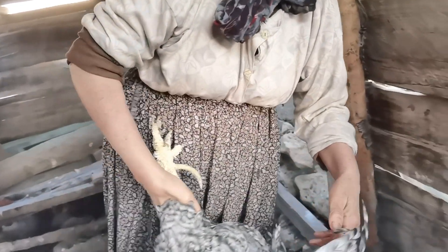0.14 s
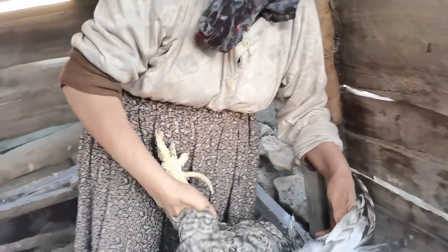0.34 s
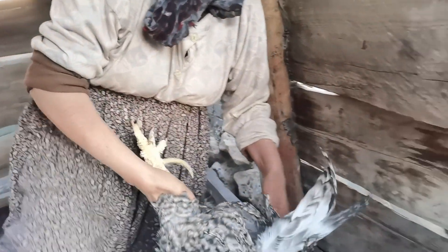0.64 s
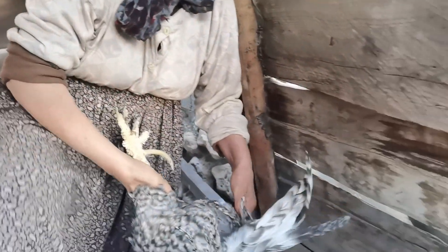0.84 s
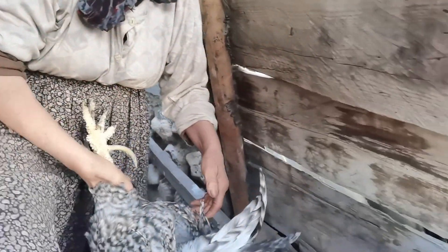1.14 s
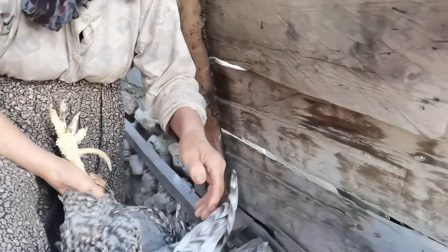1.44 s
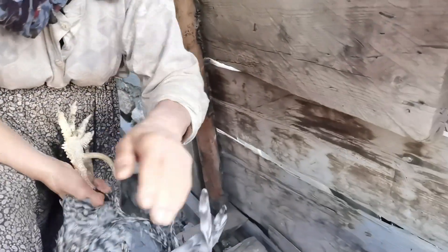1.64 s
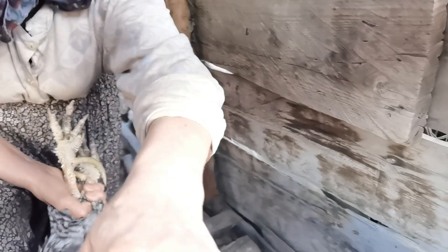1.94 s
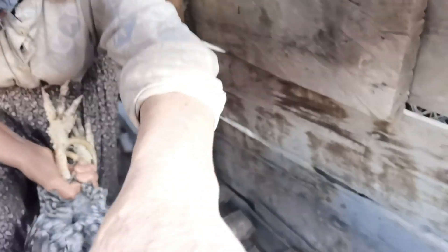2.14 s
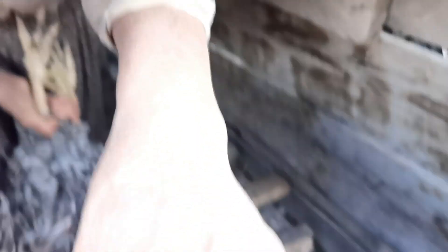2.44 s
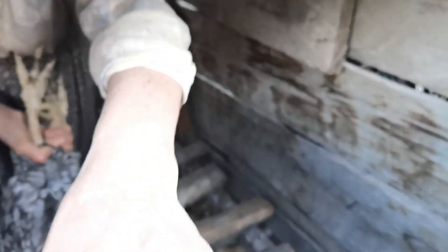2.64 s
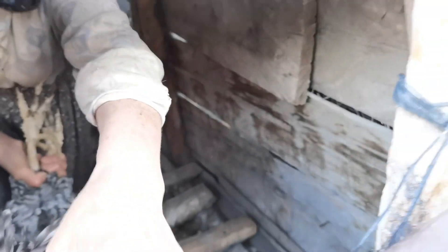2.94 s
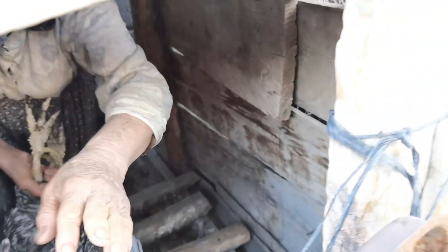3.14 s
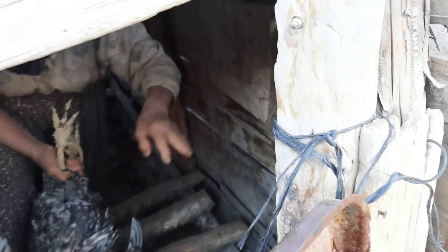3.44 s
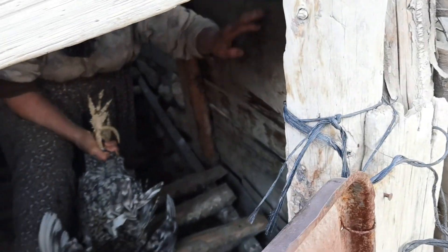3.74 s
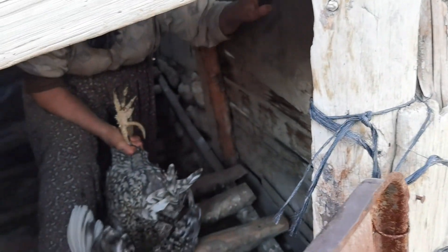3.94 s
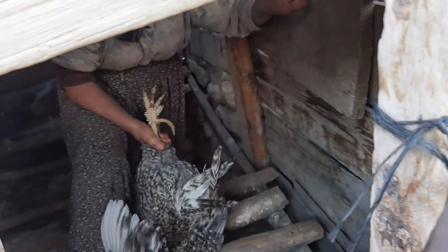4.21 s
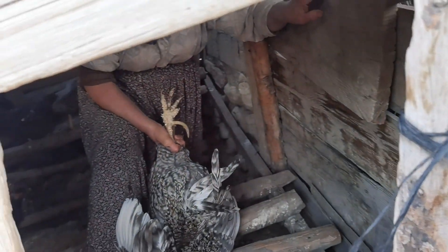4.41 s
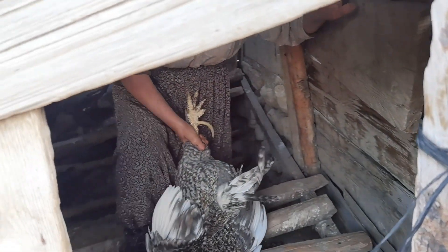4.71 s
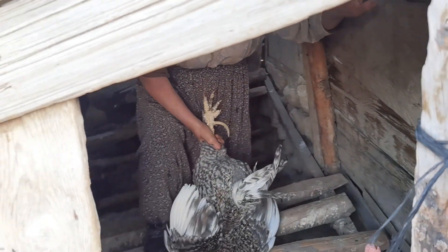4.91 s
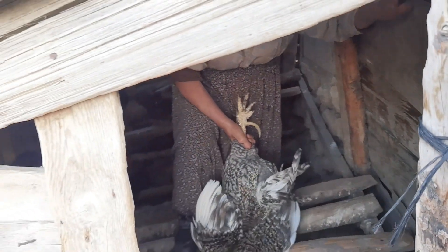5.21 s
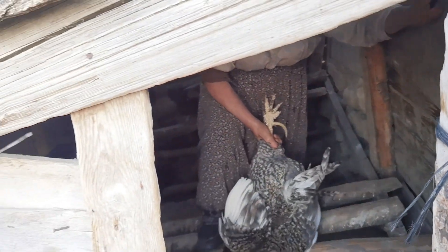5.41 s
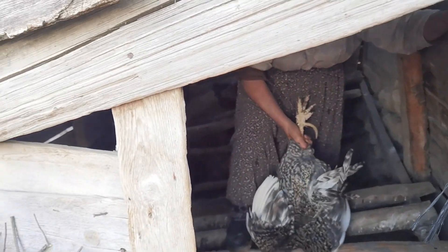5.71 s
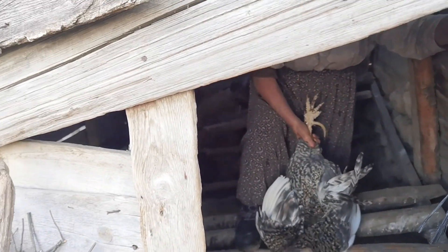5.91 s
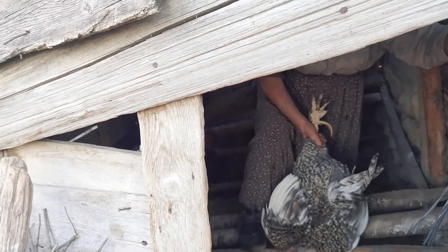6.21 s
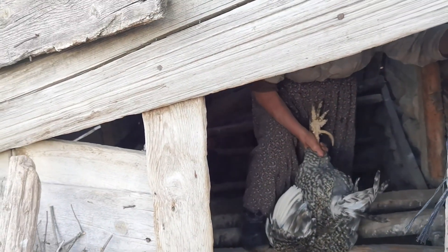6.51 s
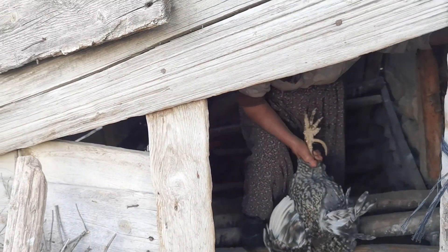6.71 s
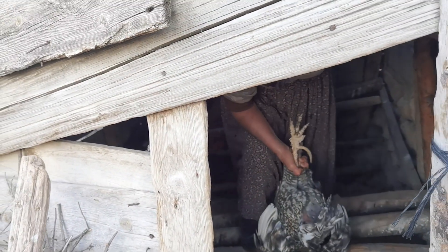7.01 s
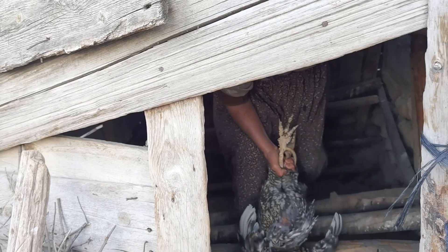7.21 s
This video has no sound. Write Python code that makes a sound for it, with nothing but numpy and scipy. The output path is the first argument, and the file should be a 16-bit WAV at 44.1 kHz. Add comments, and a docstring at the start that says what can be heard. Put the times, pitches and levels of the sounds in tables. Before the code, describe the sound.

A rooster held by its legs cries out in a wooden coop, close to a handheld stereo microphone. The first squawk, 0-0.8 s, rises from a muffled moan to a loud, hoarse rasp, then steadies into a buzzy tone and falls. Faint knocks and gulps follow, and a second strong rasping call runs from 1.3 to 2.1 s. At about 2.4-2.7 s come sharp cracks, a rustle and a low hollow ring. A somewhat weaker third squawk spans 2.5-3.3 s. Soft thuds and gulps lead to the fourth, 3.8-4.6 s, and the fifth, 5.1-5.9 s, which ends clearer. Light knocks and a dry hinge creak occupy 5.9-6.6 s, with quick gulps. The last call, 6.6-7.3 s, is higher and cleaner, dropping abruptly. Low handling rumble, quiet yard murmur and dry rustle continue throughout, with short plank reflections.

```python
"""A rooster's syrinx drives six squawks with two oscillators: a rising whistle and a lower flap.
Unlocked oscillators mix into a rasp; locked ones give a clear stack of harmonics, shaped by throat and gape.
Gulps precede calls as damped tones and noise puffs; the planks of the coop answer with decaying noise.
Short knocks are noise bursts, a hinge creaks by stick-slip, and a hollow thing rings in two modes.
Shaped noise gives hand rumble, yard murmur and a swelling dry rustle at two hand-held microphone ports."""
import sys
import numpy as np
from scipy import signal
from scipy.fft import rfft, irfft, next_fast_len
from scipy.io import wavfile
from scipy.ndimage import uniform_filter1d, map_coordinates

SR = 44100
rng = np.random.default_rng(int(sys.argv[2]) if len(sys.argv) > 2 else 0)


def pcm_store(signal):
    """Save signal as 16-bit PCM."""
    levels = np.round(np.clip(np.atleast_2d(signal), -1, 1) * 32767)
    wavfile.write(sys.argv[1], SR, levels.astype(np.int16).T)


N = 324443

# Course of the voice: (time [s], whistle pitch [Hz], whistle level [dB], throat effort [dB])
VOICE = [(0, 929, -63, -39), (.04, 945.9, -43, -67), (.214, 1016, -36.5, -60.5), (.224, 1075, -30.5, -32),
         (.28, 1151, -23, -18.5), (.4, 1218, -16.5, -17), (.46, 1196, -25.5, -16.5),
         (.55, 1211, -23.5, -14), (.62, 1180, -24.5, -17), (.68, 1147, -17, -15.5), (.72, 1010, -19.5, -21),
         (.75, 932.7, -34, -41.5), (.775, 899.5, -72, -54.5), (1.27, 889.8, -72.5, -61),
         (1.35, 945.1, -45, -71), (1.47, 1031, -32.5, -60), (1.53, 1058, -29, -28.5),
         (1.6, 1130, -31, -22.5), (1.63, 1153, -52.5, -20.5), (1.65, 1179, -17.5, -19.5),
         (1.9, 1198, -17, -15), (1.97, 1180, -16.5, -18), (2.03, 1116, -19.5, -20.5),
         (2.065, 997.6, -34.5, -32), (2.11, 940.1, -75, -56.5), (2.54, 951.2, -71, -51),
         (2.62, 944, -41, -72), (2.75, 974.2, -47, -53), (2.82, 1122, -33.5, -35.5), (2.9, 1169, -34, -29),
         (3.07, 1161, -32.5, -25), (3.13, 1145, -21, -27.5), (3.2, 1059, -34, -25.5),
         (3.24, 1049, -37.5, -43.5), (3.28, 1023, -60, -71.5), (3.83, 967.8, -59, -73),
         (3.97, 965.2, -49, -69.5), (4.04, 1042, -33, -36), (4.09, 1082, -40, -29),
         (4.18, 1114, -23.5, -23), (4.25, 1124, -29, -19), (4.45, 1198, -24.5, -18),
         (4.49, 1082, -37, -15.5), (4.555, 1062, -29.5, -17), (4.59, 1017, -45, -40.5),
         (4.63, 994.2, -68, -71.5), (5.13, 846, -63.5, -51), (5.22, 893.4, -45, -78),
         (5.3, 919.2, -44, -54.5), (5.36, 1075, -28.5, -35), (5.41, 1171, -34, -23),
         (5.5, 1263, -33.5, -18), (5.735, 1269, -36, -20.5), (5.765, 1058, -32.5, -20.5),
         (5.805, 1043, -27, -22.5), (5.835, 918, -32, -36.5), (5.89, 850, -76, -83),
         (6.57, 968.5, -58, -61), (6.65, 998.4, -48, -52.5), (6.73, 1013, -65, -45),
         (6.79, 1171, -37, -29.5), (6.83, 1284, -31, -25.5), (6.985, 1356, -24.5, -20.5),
         (7.02, 1385, -26, -19.5), (7.165, 1367, -30, -20), (7.195, 1096, -41, -19),
         (7.232, 1043, -39, -27.5), (7.262, 922, -33.5, -45.5), (7.3, 855, -88, -48.5)]
# Steadier stretches of the syrinx:
# (start [s], end [s], roughness [0-1], half-pitch lines [0-1], quarter-pitch lines [0-1])
LOCKED = [(.215, .27, .3, 0, 0), (.5, .57, .6, .85, 0), (.57, .67, .4, .8, .6), (.67, .74, .25, 1, .2),
          (1.915, 2.0, .28, .8, .6), (2.0, 2.06, .22, 1, .3), (3.065, 3.15, .45, .85, .5),
          (3.15, 3.215, .2, .7, .1), (4.0, 4.07, .3, 0, 0), (4.16, 4.2, .45, 0, 0),
          (4.485, 4.57, .12, 1, 0), (5.34, 5.4, .15, 0, 0), (5.755, 5.84, .14, 1, 0),
          (6.79, 6.83, .2, .2, 0), (6.83, 6.852, .6, .2, 0), (6.852, 6.995, .15, .35, 0),
          (7.185, 7.255, .27, 1, 0)]
# A moan through the shut beak, a rasp as it opens, locking, then spent breath:
# (start [s], flap leap [s], beak opening [s], locking [s], end [s])
PHASES = [(0, .2, .22, .55, .79), (1.27, 1.415, 1.5, 1.915, 2.12), (2.54, 2.8, 2.8, 3.07, 3.28),
          (3.83, 4.1, 4.03, 4.485, 4.63), (5.13, 5.36, 5.33, 5.755, 5.89), (6.57, 6.75, 6.75, 7.185, 7.3)]
# Differences between squawks: (flap pitch in the moan [Hz], after its leap [Hz], at the lock [Hz],
# gape resonance on opening [Hz], midway [Hz], at the lock [Hz], chest level in the moan [dB],
# chest level in the rasp before it follows effort [dB], treble level before clarity dulls it [dB],
# left over right [dB], upper beak band [relative], hoarse shaking of the flap [relative],
# gain of the air above the beak band [dB], gain of the palate band [dB])
SQUAWKS = [(485.7, 535, 610, 2300, 2310, 2400, -37.5, -31, -11.5, -2.5, 3.7, 2.3, -1, 0),
           (368.9, 500, 540, 2800, 2550, 2300, -31, -31.5, -11.5, 1.5, 2.2, 0.9, 2, 2),
           (504.5, 565, 545, 2460, 2440, 2700, -34.5, -45.5, -10.5, 5.5, 11, 1.4, 2, 2),
           (494.7, 545, 570, 2100, 2280, 2240, -41, -35, -13.5, 3.5, 14, 1.1, 4.5, -3.5),
           (411.4, 535, 560, 2800, 2350, 2150, -44, -37, -19.5, 2, 5, 1.4, -4.5, -0.5),
           (526.7, 555, 565, 2350, 2500, 2150, -42, -37, -15, 0.5, 2.1, 0.8, -0.5, 0)]
# Throat response: (frequency [Hz], relative gain [dB])
THROAT = [(900, -47), (1400, -13), (1650, -12.5), (1950, -11.5), (2300, -8.5), (2650, -10), (3050, -14),
          (3350, -14), (3950, -21.5), (4550, -16.5), (5700, -18.5), (7600, -31.5), (9300, -20),
          (10400, -29), (15500, -38.5)]
# Chest response: (frequency [Hz], relative gain [dB])
CHEST = [(250, -33.5), (400, -14), (520, -5), (800, 1), (1000, 2.5), (1350, -4), (1700, -49.5)]
# Gulps before a call: (time [s], level before fixed gains [dB], bright part above it [dB])
GULPS = [(1.227, -45.5, 12), (1.251, -38.5, 5.5), (1.266, -42.5, -19), (2.533, -41, 12.5), (3.746, -59, 0),
         (3.779, -48.5, -10), (3.794, -45, 9), (3.815, -48, 10), (3.856, -53, 18.5), (5.051, -59, 16.5),
         (5.08, -48.5, 17), (5.095, -45.5, 20), (5.112, -45.5, 19.5), (6.438, -52, 14), (6.471, -54, 21),
         (6.48, -52, 24), (6.497, -44, 23), (6.517, -47.5, 22), (6.528, -41, 22.5)]
# Phase lead of the left port over the right: (frequency [Hz], phase [rad])
PORT_LEAD = [(300, 0), (1000, 0.69), (2700, 1.66), (5000, 1), (12000, -4.5)]
# Turning of the microphones: (time [s], advance of the left port over the right [ms])
TURN = [(.5, -0.0039), (1.8, 0.068), (3, 0.18), (4.3, -0.003), (5.6, -0.061), (7, -.1)]
# Decay of the plank answer: (frequency [Hz], 60 dB decay time [s])
PLANKS = [(300, 0.12), (10000, 0.025)]
# Modes of the hollow thing: (frequency [Hz], level [dB], 60 dB decay time [s])
HOLLOW_MODES = [(325, -2, 2.2), (150, -7, 1.2)]
# Bumps that ring it: (time [s], level before the mode levels [dB])
HOLLOW_HITS = [(2.43, -57), (2.483, -49.5)]
# Short noisy knocks, the first probably a gulp:
# (time [s], level before fixed gains [dB], thud relative to it [dB], 60 dB decay time of the noise tail [s])
KNOCKS = [(0.0044, -37.5, -8, 0.046), (0.8719, -43, -27, 0.087), (1.0161, -42, -25, 0.25),
          (1.1946, -41.5, -11, 0.46), (2.4285, -21, -37.5, 0.46), (2.4839, -23, -19.5, 0.17),
          (2.7158, -19.5, -20.5, 0.33), (3.4635, -42, 5.5, 0.15), (3.6282, -59.5, 10, 0.089),
          (4.688, -36, -2, 0.19), (5.909, -38.5, -33, 0.05), (5.931, -44, -2, 0.11),
          (5.95, -42, -13, 0.048), (6.232, -41, -6, 0.1)]
# Colour of the crack: (frequency [Hz], relative gain [dB])
KNOCK_COLOUR = [(530, -44), (900, -26), (1340, -1.5), (1770, -10), (2140, -4.5), (4570, -11.5),
                (7400, -21.5), (8980, -20), (16000, -28)]
# A door hinge slips: (time [s], mean slip rate [1/s], level before fixed gain [dB])
CREAK = [(5.95, 72, -65), (6.05, 200, -67), (6.3, 290, -74.5), (6.38, 370, -57), (6.45, 120, -57),
         (6.55, 60, -46), (6.64, 22, -66), (6.68, 21, -113)]
# Handling rumble: (time [s], level before bumps [dB])
HANDS = [(0, -63.5), (1, -69), (1.9, -49.5), (2.3, -60.5), (2.6, -54.5), (3.7, -61.5), (5.6, -55),
         (6.6, -58.5), (7.36, -55.5)]
# The grip jolts: (time [s], rise of the rumble [dB])
BUMPS = [(1.13, 8.5), (2.088, 10.5), (6.03, 4), (6.236, 2.5)]
# The background noise swells: (start [s], end [s], murmur level [dB], rustle level [dB])
SWELLS = [(0, 0.179, -65.5, -63), (1.11, 1.496, -71.5, -67.5), (2.148, 2.437, -75.5, -64),
          (2.401, 2.552, -49.5, -49.5), (4.638, 4.809, -53.5, -56), (5.877, 6.622, -64.5, -67.5),
          (7.258, 7.397, -50.5, -65.5)]
# Constant floor under the swells: (murmur level [dB], rustle level [dB])
FLOOR_DB = (-64, -71.5)
# Thin wavering tones: (start [s], end [s], frequency [Hz], mean level [dB])
THIN_TONES = [(0.753, 1.158, 1148, -69.5), (3.45, 3.884, 224, -62.5)]
# Noise spectra of rumble, yard murmur and dry rustle: (frequency [Hz], relative gain [dB])
RUMBLE = [(20, -20.5), (64, 0), (211, -7), (300, -12.5), (390, -42), (660, -89.5)]
YARD = [(150, -34), (250, -0.5), (600, -2.5), (1200, -8.5), (2500, -16.5), (5000, -32.5)]
RUSTLE = [(1500, -13.5), (3000, -6.5), (5500, -11.5), (7500, -28.5), (9400, -1.5), (11500, -14.5),
          (16000, -15.5)]

FLAP_CLIMB, FLAP_SAG = 1.06, .75  # pitch ratios: climb through the moan, fall as the breath ends
LEAP_S, GASP_S = .03, .06  # duration of the flap leap; the moan level holds until this long before the end
FREE_ROUGH = .8  # roughness of the unlocked oscillators, 0-1
CLEAR_DB = 0.03  # scale of the overtone loss per quarter-pitch step in a clear voice
CHEST_HZ, SHUT_HZ = 790, 2158  # chest resonance; gape resonance as the beak closes, before clarity tunes it
LOCKED_THIRD_DB = -6.5  # third harmonic of a fully locked, clear flap relative to effort
MOAN_SWELL_DB, SPENT_DB = 8.5, -71  # rise through the moan; moan level at the end
CHEST_FOLLOWS, FULL_DB, LOCK_DB = 0.47, -18, 5  # chest dB per dB of effort, full effort, gain at full lock
BUMP_S, SWELL_EDGE_S = 0.074, 0.26  # 1/e half-width of a jolt; ramp of a noise swell before squaring
TOP_HZ = 15950  # upper band limit


def rooster():
    """Two coupled oscillators: flap-shaken whistle pulses excite the throat and their mixing fills the chest."""
    hz, whistle_db, effort_db = curves(VOICE)
    free_hz, gape_hz, moan_db, rasp_db = gestures()
    t = np.arange(N) / SR
    call = np.array([(t >= a) & (t < b) for a, *_, b in PHASES])
    on = uniform_filter1d(call.sum(axis=0) * 1., size=601)
    traits = uniform_filter1d(np.transpose(SQUAWKS)[-6:] @ call, size=601)
    tilt_db, pan_db, upper, hoarse, air_db, palate_db = traits
    rough, half, quarter = locking(t)
    clear = 1 - rough / FREE_ROUGH
    gape_hz = gape_hz + clear * (2 * hz - gape_hz)  # a clear voice tunes the gape to its second harmonic

    phase = 2 * np.pi * np.cumsum(hz) / SR
    flap_hz = np.where(half > .1, hz / 2, free_hz)
    flap = 2 * np.pi * np.cumsum(flap_hz) / SR + .6 * hoarse * rough * (1 - half) * wobble(60)
    jitter = rough ** 2 * amp(2.5 * wobble(11)) * (1.3 * wobble(90) + 0.9 * wobble(500))
    shaken = phase + jitter + rough ** 3 * np.sin(flap) + 0.13 * wobble(300)
    pulses = pulse_train(shaken, clear, half, quarter)
    size = amp(rough * (1.1 * wobble(130) + 1.7 * wobble(35))) * (1 + 1.2 * rough * np.cos(flap))
    breath = rng.standard_normal(N) * (1 + 6.9 * np.cos(shaken))
    source = size * (steady(pulses) + 0.27 * rough * breath)
    body, treble = throat_bands(source, gape_hz, rough, upper, air_db, palate_db)
    # a clear voice is duller than a rasp
    tilt_db = tilt_db - 4 * clear - 9 * clear * (1 - half) + 3 * wobble(40)
    throat = amp(effort_db) * (body + amp(tilt_db) * treble)

    effort = np.clip(1 + (effort_db + 30) / 35, .28, 1)
    mixed = chest_mixing(phase, flap, size, breath, effort, rough, half, quarter)
    lower = np.sqrt(np.abs(2 - 1.96 * rough)) * (1 - 0.83 * clear * (1 - half))
    lower = lower * amp(rough * (1.5 - half) * 4 * wobble(60))
    flap_shake = rough * (1 - half) * (.25 * hoarse ** 2 + 1.1 * (1 - effort)) * wobble(160)
    lower = lower * np.cos(flap + flap_shake)
    whistle = amp(whistle_db + effort * rough * (3.5 * wobble(70) + 3 * wobble(22)))
    wavering = phase + np.sqrt(effort) * rough * hoarse * (1 - half) * wobble(80)
    whistle = whistle * (np.cos(wavering) + 0.11 * np.cos(2 * wavering))
    chest = amp(moan_db) + amp(rasp_db + CHEST_FOLLOWS * (effort_db - FULL_DB) + LOCK_DB * half)
    third = half * clear * amp(effort_db + LOCKED_THIRD_DB) * np.cos(phase * 3 / 2)
    low = on * (chest * (mixed + lower) + whistle + third) + gulps()

    spread = port_spread(treble, amp(effort_db + tilt_db))
    return low + on * (throat + spread) * amp(np.array([pan_db, -pan_db]) / 2)


def locking(t):
    """Mode locking replaces free rasping by steadier states with half- and quarter-pitch subharmonics."""
    state = np.outer([FREE_ROUGH, 0, 0], np.ones(N))
    for a, b, *values in LOCKED:
        state[:, (t >= a) & (t < b)] = np.array(values)[:, None]
    return uniform_filter1d(state, size=801)


def gestures():
    """Articulation: interpolated phases give flap pitch, gape resonance, moan level and rasp chest level."""
    flap, mouth, chest = [], [], []
    for (start, leap, opens, lock, end), row in zip(PHASES, SQUAWKS):
        low_hz, leapt_hz, last_hz, open_hz, mid_hz, lock_hz, moan_db, rasp_db = row[:8]
        flap += [(start, low_hz), (leap - LEAP_S / 2, low_hz * FLAP_CLIMB),
                 (leap + LEAP_S / 2, leapt_hz), (lock, last_hz), (end, last_hz * FLAP_SAG)]
        mouth += [(opens, open_hz), ((opens + lock) / 2, mid_hz), (lock, lock_hz), (end, SHUT_HZ)]
        chest += [(start, moan_db - MOAN_SWELL_DB, rasp_db), (opens, moan_db, rasp_db),
                  (end - GASP_S, moan_db, rasp_db), (end, SPENT_DB, rasp_db)]
    return curves(flap) + curves(mouth) + curves(chest)


def pulse_train(shaken, clear, half, quarter):
    """Period multiplication: alternate strong and weak pulses put lines between the harmonics."""
    share = [1, quarter, half, quarter]
    pulses = np.zeros(N)
    for k in range(5, 60):  # k counts quarters of the whistle pitch
        if k % 2 == 0 or k < 24:
            loss_db = CLEAR_DB * clear * (0.5 - half) * k
            pulses += share[k % 4] * amp(-loss_db) * np.cos(k * shaken / 4)
    return pulses


def throat_bands(source, gape_hz, rough, upper, air_db, palate_db):
    """Source-filter principle: throat, palate and moving gape resonances form a body band and a treble band."""
    bright = filtered(source, causal(THROAT))
    palate = filtered(bright, lambda f: 1 / (1 + ((f - 3350) / 450) ** 4))
    bright = bright + (amp(palate_db) - 1) * palate
    treble = filtered(bright, lambda f: 1 / (1 + (4000 / (f + 1)) ** 8))
    rest = bright - treble
    air = filtered(treble, lambda f: 1 / (1 + (5200 / (f + 1)) ** 8))
    treble = treble + (amp(air_db) - 1) * air
    upper_hz = 1.86 * gape_hz * (1 + 0.03 * wobble(6))
    treble = treble + upper * rough ** 2 * gape(bright, upper_hz, width_hz=530)
    body = rest + (1.3 + 1.7 * rough) * gape(bright, gape_hz, width_hz=550)
    return steady(body), steady(treble)


def gape(x, centre_hz, width_hz):
    """A sliding resonance by heterodyning: shift its centre to zero, smooth, shift back."""
    turn = 2 * np.pi * np.cumsum(centre_hz) / SR
    smooth = lambda f: 1 / (1 + 2j * f / width_hz) ** 2
    cosine = filtered(x * np.cos(turn), smooth) * np.cos(turn)
    sine = filtered(x * np.sin(turn), smooth) * np.sin(turn)
    return cosine + sine


def chest_mixing(phase, flap, size, breath, effort, rough, half, quarter):
    """Intermodulation: the oscillators mix in bursts through the chest, and more weakly at their sum."""
    t = np.arange(N) / SR
    # midway between the difference tone and the chest resonance
    midway = np.cos((phase - flap) / 2 + np.pi * CHEST_HZ * t + 1.5 * wobble(110))
    beat = (1 - half) * amp(5 * wobble(45)) * midway + .6 * breath
    resonant = steady(filtered(size * beat, causal(CHEST)))
    mixed = 1.3 * effort * rough * (1 - 0.43 * half) * resonant
    mixed = mixed + .5 * quarter * np.cos(phase * 3 / 4)  # three-quarter line of the locked state
    return mixed + 0.26 * effort ** 3 * rough * size * np.cos(phase + flap + wobble(120))


def port_spread(treble, gain):
    """Shading and path difference: the microphone body shades treble and hand sway drifts the port phases."""
    far_side = gain * treble * [[.35], [-.35]]
    sway = 0.85 * wobble(15)  # phase [rad]
    turned = gain * signal.hilbert(treble, next_fast_len(N))[:N]
    drift = np.real(turned * (np.exp(1j * np.array([sway, -sway])) - 1))
    return far_side + drift


def gulps():
    """Impulse excitation: syrinx snaps ring the windpipe's low resonance and send rough puffs up the throat."""
    low, puff, t = np.zeros(N), np.zeros(N), np.arange(1500) / SR
    for s, db, bright_db in GULPS:
        first = round(s * SR)
        rise = amp(db) * (1 - np.exp(-t / 0.0002))
        ring = np.sin(2 * np.pi * rng.normal(597, 45) * t)
        low[first:][:len(t)] += amp(7.5 - 60 * t / 0.066) * rise * ring
        puff[first:][:len(t)] += amp(bright_db + 15.5 - 60 * t / 0.0257) * rise * rng.standard_normal(len(t))
    return low + filtered(puff, lambda f: causal(THROAT)(f) / (1 + (f / 3300) ** 4))


def coop(x):
    """Reverberation: close planks answer differently at each port, and anew per call as the microphones move."""
    out = np.zeros((2, N + SR))
    edges = [0] + [round((a - .1) * SR) for a, *_ in PHASES[1:]] + [N]
    for a, b in zip(edges, edges[1:]):
        hz, t, z = signal.stft(rng.standard_normal((2, SR // 5)), SR, nperseg=128)
        hz = hz[:, None]
        decay = amp(-60 * t / along(PLANKS, hz))
        colour = decay * (hz / 2000) ** 0.15 / (1 + (650 / (hz + 1)) ** 4)
        tail = signal.istft(z * colour, SR, nperseg=128)[1]
        wet = signal.fftconvolve(x[:, a:b], tail / np.linalg.norm(tail[0]), axes=1)
        out[:, a + 100:a + 100 + wet.shape[1]] += wet  # delayed by 100 samples
    return out[:, :N]


def hollow():
    """Modal vibration: a bumped hollow thing rings in two damped low modes."""
    t, out = np.arange(N) / SR, np.zeros(N)
    for s, db in HOLLOW_HITS:
        u = np.clip(t - s, 0, None)
        for hz, level, t60 in HOLLOW_MODES:
            decay = amp(db + level - 60 * u / t60 + 2 * wobble(27))
            tone = np.sin(2 * np.pi * hz * u + .4 * wobble(26))
            out += decay * tone * (1 - np.exp(-u / 0.0042))
    return np.sqrt(2) * out


def knocks():
    """Transient noise: each knock is a sharp crack, a grainy decaying tail and a low, soft thud."""
    crack, thud, t = np.zeros((2, N + SR)), np.zeros(N + SR), np.arange(SR // 4) / SR
    grain_db = 2.7 * wobble(200)
    for s, db, thud_db, t60 in KNOCKS:
        first = round(s * SR)
        tail = 0.4 * amp(-60 * t / max(t60, .01) + grain_db[first:][:len(t)])
        shape = amp(-60 * t / 0.0044) + tail
        crack[:, first:first + len(t)] += amp(db + 2.0) * shape * rng.standard_normal((2, len(t)))
        thud[first:][:len(t)] += amp(db + thud_db - 60 * t / 0.19) * rng.standard_normal(len(t))
    body = lambda f: amp(12.0) / (1 + (f / 700) ** 4) / (1 + (70 / (f + 1)) ** 4)
    return amp(5.0) * filtered(crack, causal(KNOCK_COLOUR))[:, :N] + filtered(thud, body)[:N]


def creak():
    """Stick-slip friction: hinge ticks at a changing, uneven rate ring a broad band of dry wood."""
    rate, db = curves(CREAK)
    slips = np.diff(np.floor(np.cumsum(rate * amp(1.6 * wobble(39))) / SR), prepend=0)
    t = np.arange(N) / SR
    ticks = slips * amp(db + 29.0 + 2.0 * wobble(160)) * (t > CREAK[0][0])

    def wood(f):
        """A damped resonance at 4900 Hz between a low cut and a high cut."""
        resonance = 1j * f * 3500 / (4900 ** 2 - f * f + 1j * f * 3500)
        return resonance / (1 + (2500 / (f + 1)) ** 4) / (1 + (f / 7000) ** 4)
    return filtered(ticks, wood)


def background():
    """Superposition of handling rumble, yard murmur, dry rustle and thin wavering tones."""
    rumble_db, = curves(HANDS)
    murmur_gain, rustle_gain = noise_swells()
    t = np.arange(N) / SR
    rumble_db = rumble_db + sum(db * np.exp(-((t - s) / BUMP_S) ** 2) for s, db in BUMPS)
    tones = np.zeros(N)
    for a, b, hz, db in THIN_TONES:
        fade = np.clip(np.minimum(t - a, b - t) / .1 + .5, 0, 1)
        tones += fade * amp(db + 3.6 * wobble(20)) * np.cos(2 * np.pi * hz * t + .8 * wobble(25))
    rumble = unit(amp(2 * wobble(12)) * rush(RUMBLE, alike=.5, patchy_db=2))
    rumble = amp(rumble_db + [[-2], [2]]) * rumble  # stronger on the right
    yard = murmur_gain * amp(2 * wobble(9)) * rush(YARD, alike=.8, patchy_db=2.5)
    flicker = amp(2.5 * wobble(14) + 2.5 * wobble(90) + 2.5 * wobble(400))
    rustle = rustle_gain * flicker * rush(RUSTLE, alike=.1, patchy_db=2.5)
    return rumble + yard + rustle + tones


def noise_swells():
    """Amplitude envelopes: soft-edged swells add to the constant floor of murmur and rustle."""
    t, gain = np.arange(N) / SR, np.outer(amp(FLOOR_DB), np.ones(N))
    for a, b, *db in SWELLS:
        swell = np.clip(np.minimum(t - a, b - t) / SWELL_EDGE_S + .5, 0, 1) ** 2
        gain = gain + np.outer(amp(db), swell)
    return gain


def rush(spectrum, alike, patchy_db):
    """Partially coherent noise: two shaped noises of patchy gain mix into stereo of rms 1."""
    z = signal.stft(rng.standard_normal((2, N)), nperseg=512)[2]
    field = uniform_filter1d(rng.standard_normal(z.shape[1:]), size=6, axis=0)
    field = uniform_filter1d(field, size=10, axis=1)
    noise = signal.istft(z * amp(patchy_db * unit(field)), nperseg=512)[1][:, :N]
    a, b = filtered(noise, lambda hz: amp(along(spectrum, hz)))
    turn = np.arccos(np.clip(alike, -1, 1)) / 2
    middle, side = np.cos(turn) * a, np.sin(turn) * b
    return unit(np.array([middle + side, middle - side]))


def amp(db):
    """Decibel law: an amplitude ratio from a level."""
    return 10 ** (np.asarray(db) / 20)


def unit(x):
    """Normalisation to an rms of 1."""
    return x / np.sqrt(np.mean(x ** 2) + 1e-20)


def steady(x):
    """Running-rms normalisation, so that breath pressure alone sets the level."""
    return x / np.sqrt(np.abs(uniform_filter1d(x ** 2, size=2001)) + 1e-12)


def along(points, hz):
    """Interpolation of (frequency [Hz], value) points on a log axis."""
    f, v = np.transpose(points)
    return np.interp(np.log(hz + 1), np.log(f + 1), v)


def curves(rows):
    """Linear interpolation in time: one value per sample for each column after the time."""
    s, *cols = np.transpose(rows)
    return [np.interp(np.arange(N) / SR, s, c) for c in cols]


def wobble(rate):
    """Band-limited fluctuation: a smooth random curve with rate knots a second."""
    return map_coordinates(rng.standard_normal(int(N * rate / SR) + 4), [np.arange(N) * rate / SR])


def filtered(x, response):
    """Linear filtering: the spectrum of x times a complex response of frequency."""
    m = next_fast_len(x.shape[-1] + 8192)
    return irfft(rfft(x, m) * response(np.fft.rfftfreq(m, 1 / SR)), m)[..., :x.shape[-1]]


def causal(points):
    """Minimum phase: a folded cepstrum gives the causal response of (frequency [Hz], gain [dB]) points."""
    def response(hz):
        cep = irfft(np.log(amp(along(points, hz)) + 1e-6))
        cep[1:len(hz) - 1] *= 2
        cep[len(hz):] = 0
        return np.exp(rfft(cep))
    return response


def scene():
    """Superposition: the direct voice with phase and time differences, its plank answer and the other sounds."""
    bird = rooster()
    sides = np.array([[1], [-1]])
    direct = filtered(bird, lambda hz: np.exp(.5j * along(PORT_LEAD, hz) * sides))
    early_ms, = curves(TURN)
    shift = early_ms * SR / 2000  # half the advance in samples, opposite at the two ports
    direct = [map_coordinates(x, [np.arange(N) + side * shift]) for x, side in zip(direct, (1, -1))]
    return direct + amp(-2.0) * coop(bird) + knocks() + creak() + background() + hollow()


def record(dry):
    """Saturation and band limiting: the loudest peaks round off and nothing above the limit passes."""
    rounded = dry / (1 + np.abs(dry / .95) ** 4) ** (1 / 4)
    return filtered(rounded, lambda hz: hz < TOP_HZ)


dry = scene()
out = record(dry)
pcm_store(out)
```